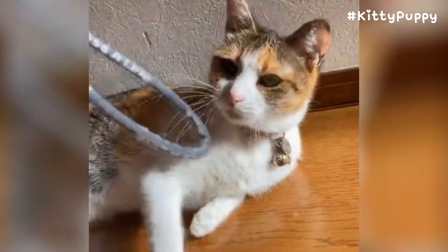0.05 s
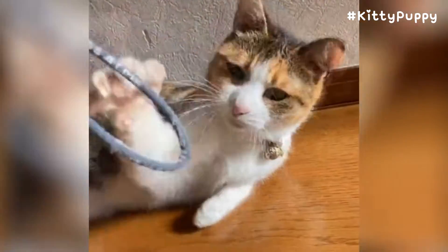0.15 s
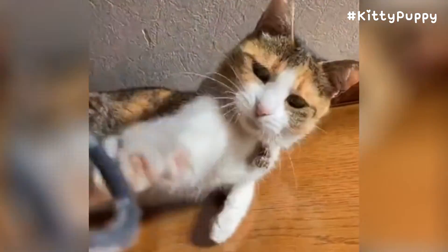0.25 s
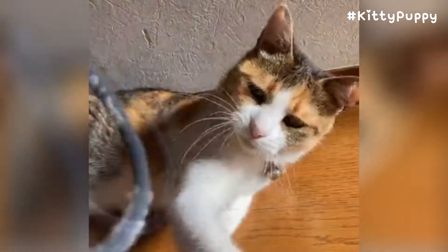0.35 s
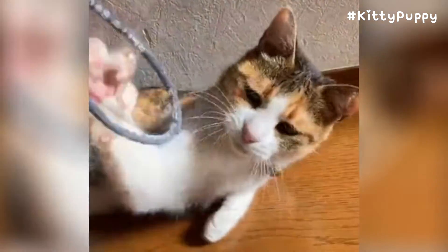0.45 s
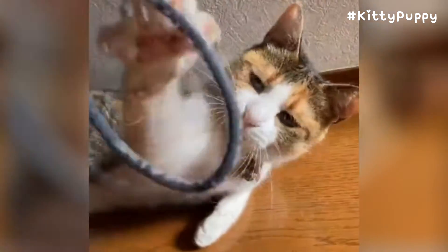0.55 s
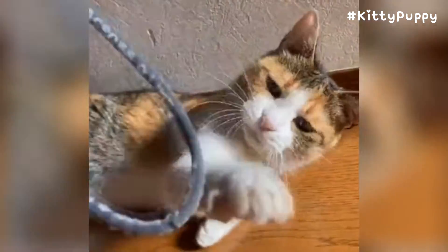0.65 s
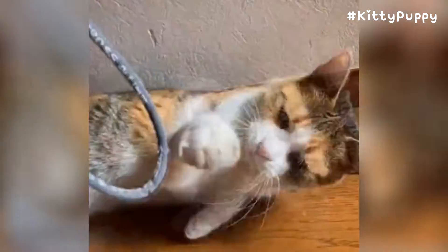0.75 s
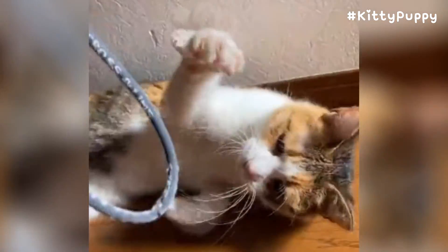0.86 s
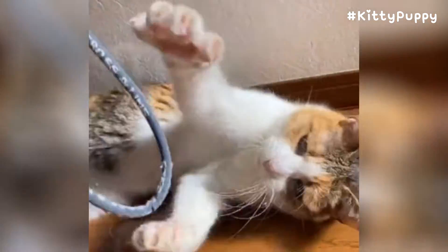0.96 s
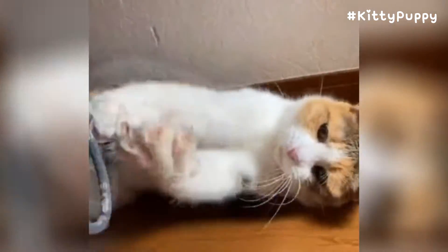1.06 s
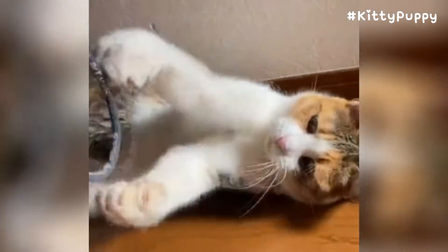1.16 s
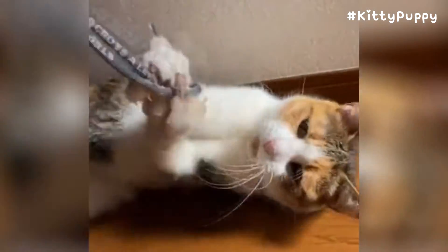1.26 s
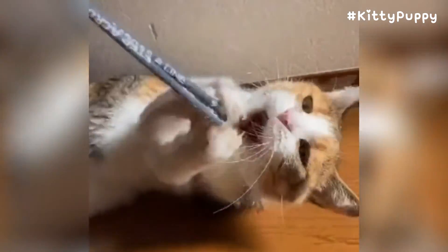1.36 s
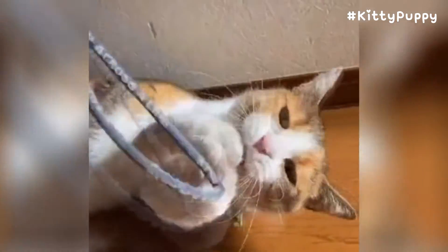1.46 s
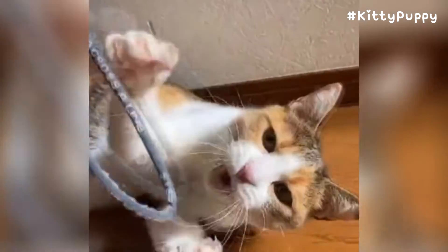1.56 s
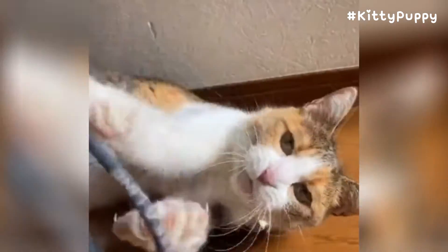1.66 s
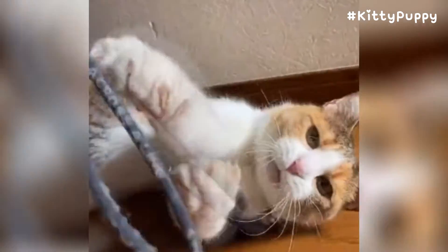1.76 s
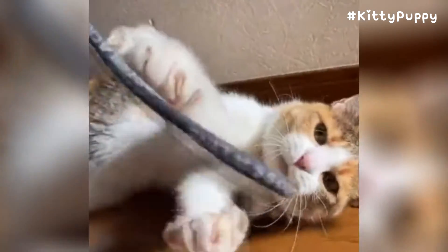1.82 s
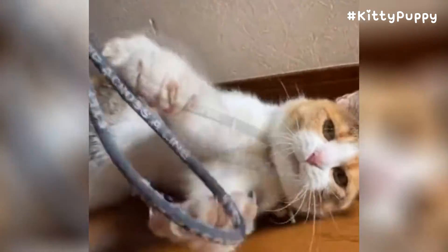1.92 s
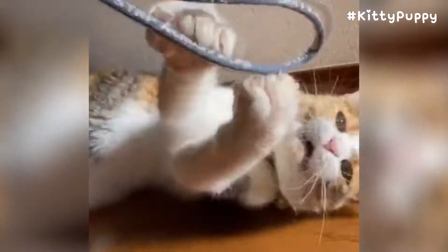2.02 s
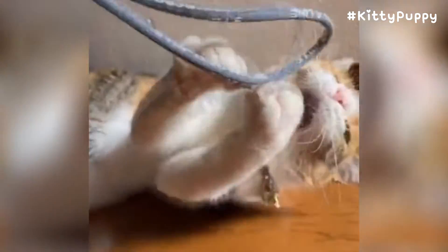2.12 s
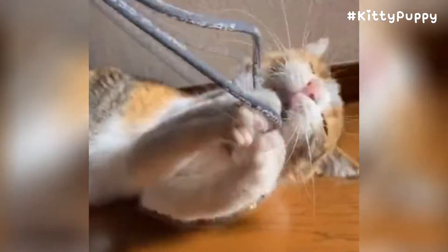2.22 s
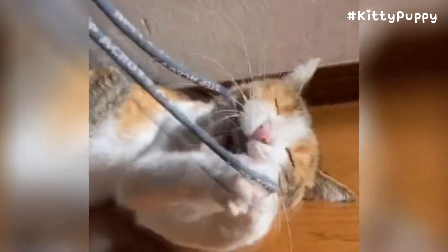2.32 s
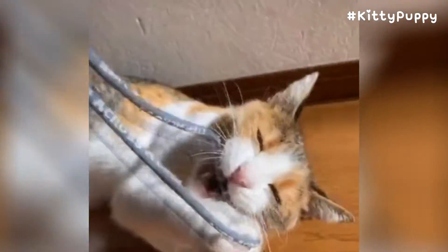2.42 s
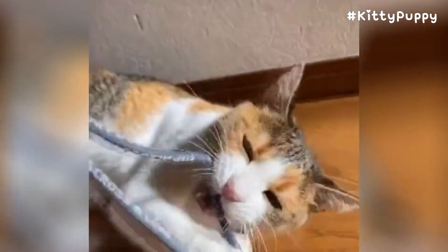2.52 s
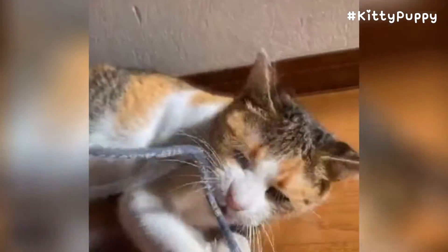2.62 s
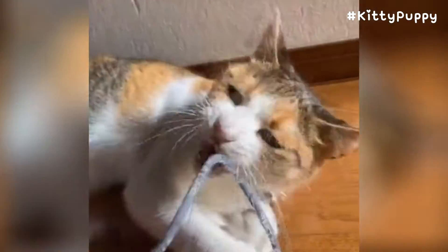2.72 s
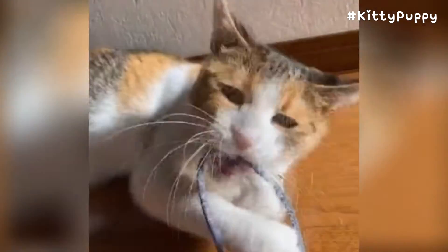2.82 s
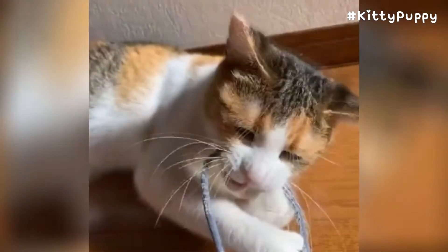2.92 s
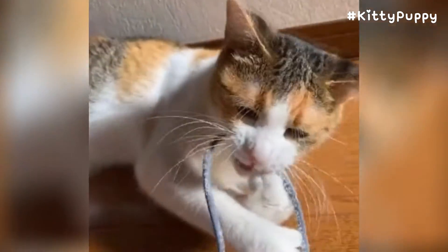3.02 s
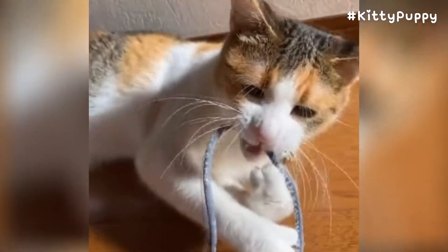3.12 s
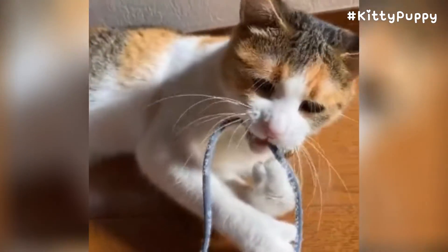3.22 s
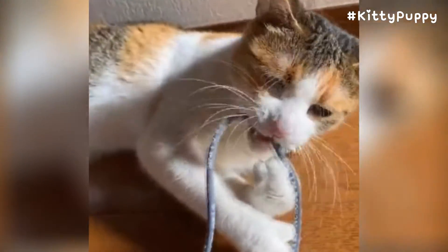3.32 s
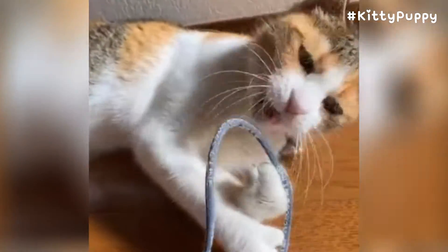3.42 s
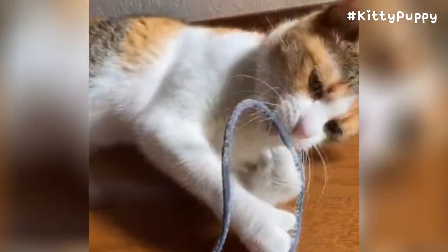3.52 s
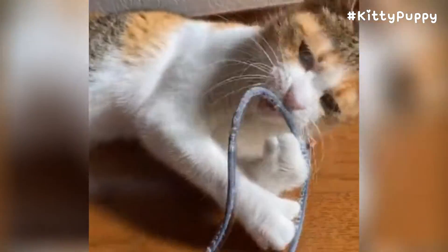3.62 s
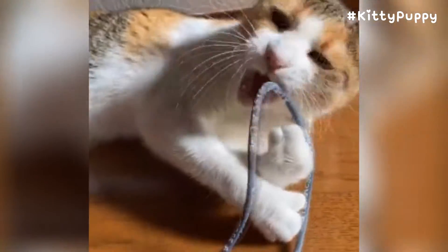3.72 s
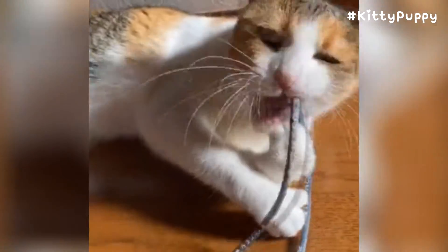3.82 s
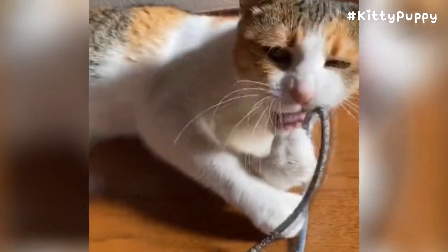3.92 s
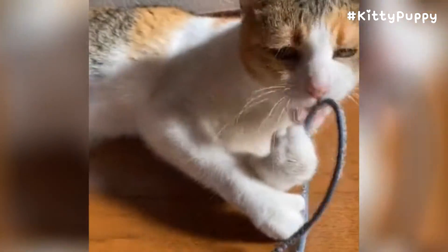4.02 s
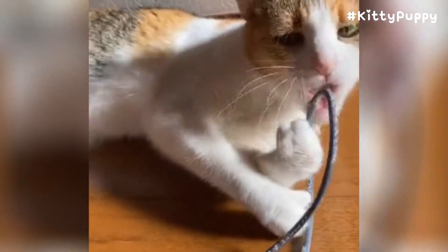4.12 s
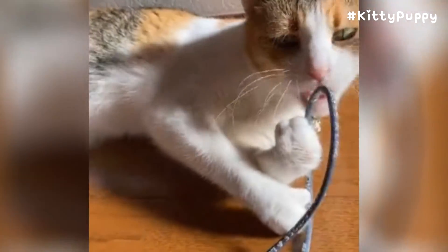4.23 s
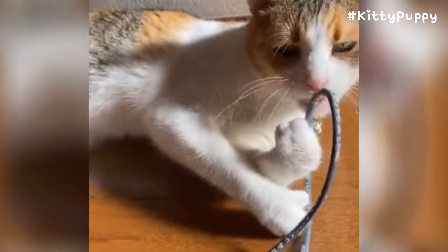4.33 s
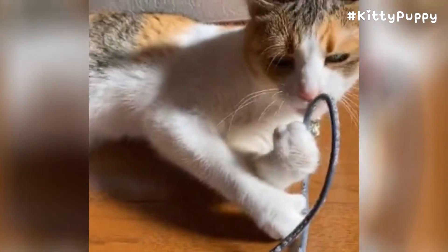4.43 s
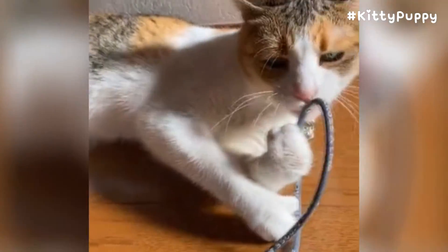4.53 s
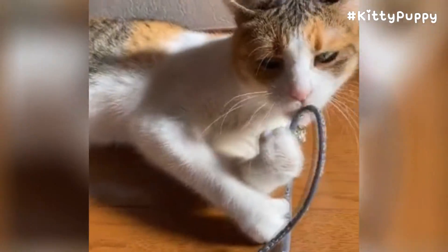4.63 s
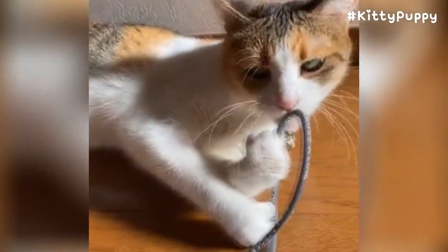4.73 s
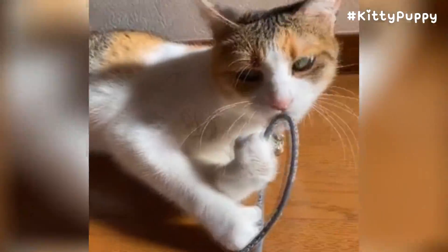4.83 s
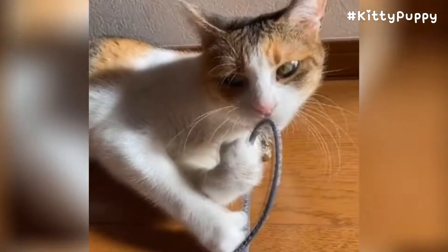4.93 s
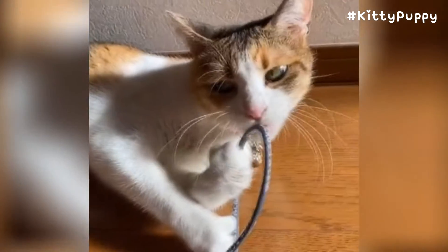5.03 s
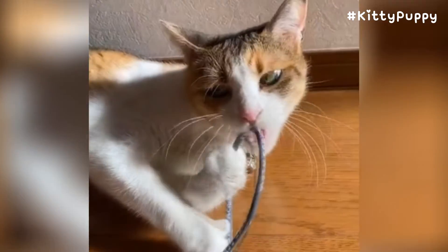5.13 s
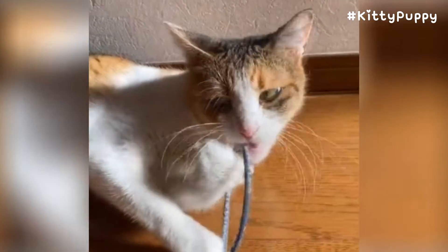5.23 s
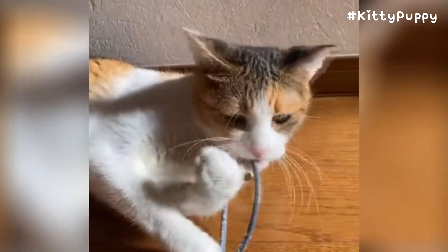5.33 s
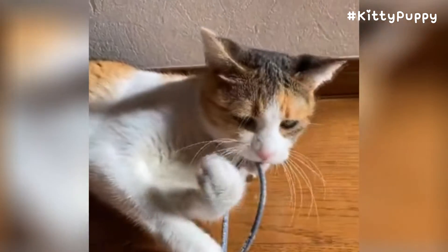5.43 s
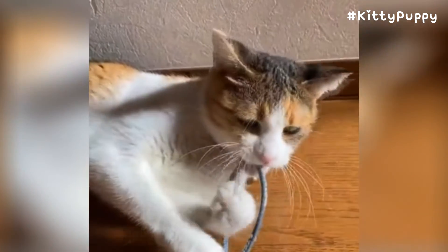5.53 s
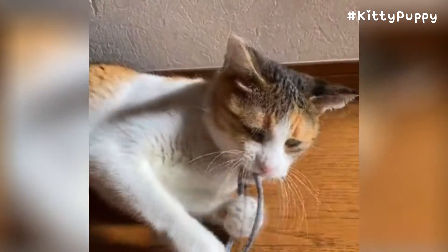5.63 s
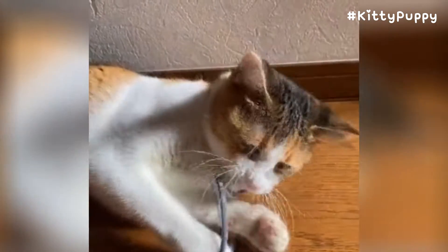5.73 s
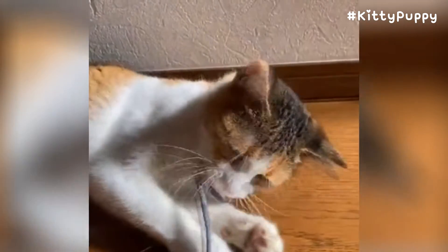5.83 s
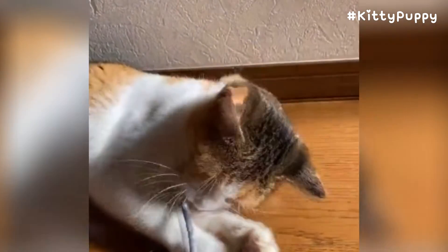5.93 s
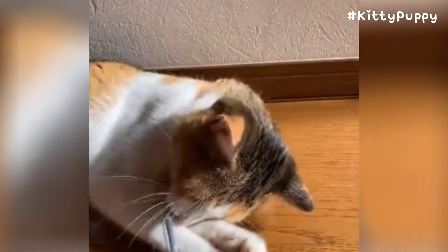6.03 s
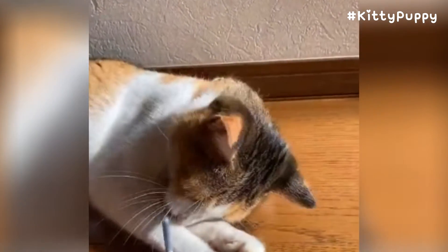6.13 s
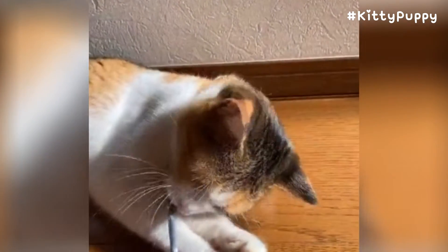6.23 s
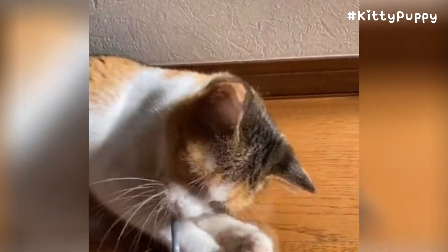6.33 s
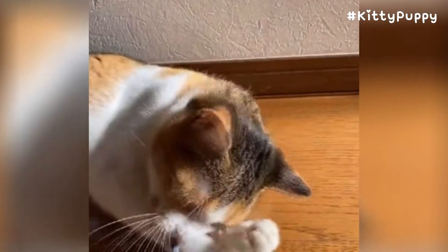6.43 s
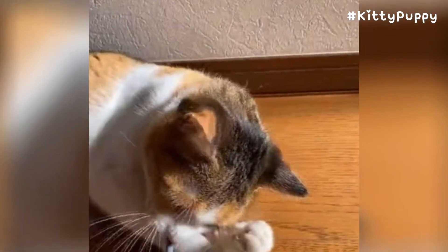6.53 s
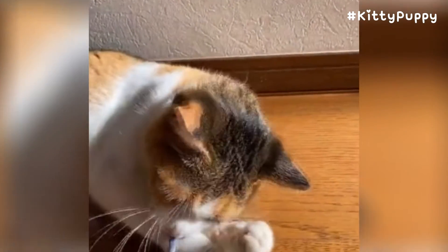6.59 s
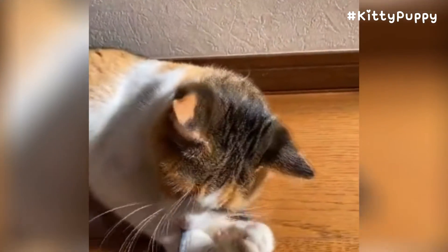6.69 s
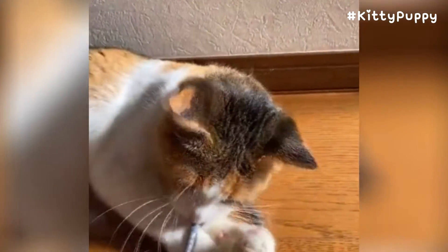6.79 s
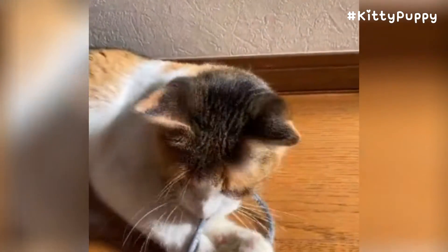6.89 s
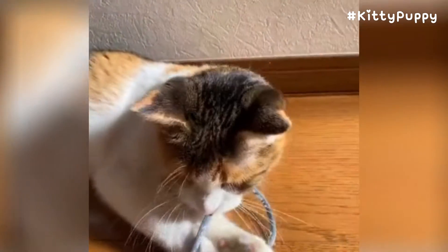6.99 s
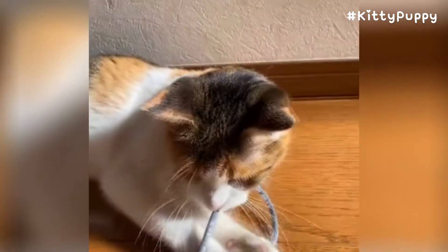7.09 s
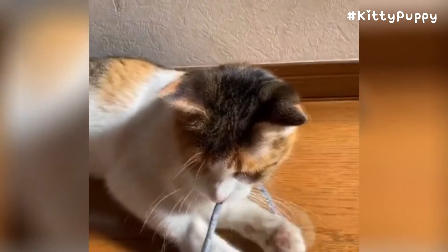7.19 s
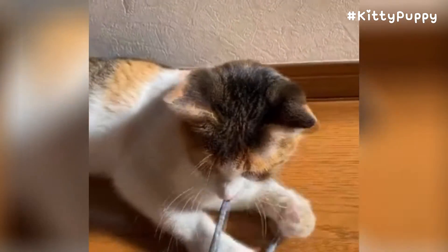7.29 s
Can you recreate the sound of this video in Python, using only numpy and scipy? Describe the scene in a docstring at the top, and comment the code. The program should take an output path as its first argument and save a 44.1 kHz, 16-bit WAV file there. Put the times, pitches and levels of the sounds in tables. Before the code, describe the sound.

Steady hiss and a low hum lie under a high, short-ringing pellet bell on a cat's collar. The bell begins softly, bursts into a dense loud jingle, then breaks into sparse chinks. Paws and claws knock wooden boards, a cord rasps and snaps lightly, and the body rubs dully. Later activity is sparse and quiet, ending with a soft rub and thud. The miking is close, with quick floor echoes and a short live room tail.

```python
"""A low hum and steady hiss come first, then a soft thud and the chink and rattle of a collar bell.
A cat wrestles with a cord on a wooden floor, close to the microphone, in a small live room.
Bell: damped shell modes and a noise spray, struck or fed by tiny taps. Paws: slips driving board modes.
Cord and body: filtered noise and clicks under stroke envelopes. Background: filtered noise and a sine.
"""
import sys
import numpy as np
from scipy import signal
from scipy.fft import rfft, irfft, next_fast_len
from scipy.io import wavfile
from scipy.ndimage import uniform_filter1d

SR = 44100
rng = np.random.default_rng(int(sys.argv[2]) if len(sys.argv) > 2 else 0)


def dump_mix(stems):
    """Bounce the given channels to the path in sys.argv[1] as a 16-bit WAV at rate SR."""
    frames = np.atleast_2d(stems).T  # one column per channel
    limited = np.clip(frames, -1, 1)  # hard clip at full scale
    pcm = np.round(limited * 32767).astype(np.int16)
    wavfile.write(sys.argv[1], SR, pcm)


N = 324399

# Event levels are ahead of each layer's trim_db and of the room.
# still room: (frequency [Hz], relative density [dB])
AIR_SPECTRUM = [(13, -36), (22, -6), (48, -2.5), (74, -3.5), (108, -1.5), (153, -9), (287, -10),
                (464, -16.5), (506, -20), (629, -17.5), (1260, -23.5), (1710, -22.5), (2130, -26.5),
                (2530, -25), (4000, -27.5), (5200, -56), (8800, -120)]
# microphone hiss: (frequency [Hz], relative density [dB])
HISS_SPECTRUM = [(3000, -34), (4200, -8.5), (4700, -0.5), (5200, 2), (5600, 0.5), (7000, -2.5), (8700, -5),
                 (9400, -15), (10300, -22.5), (13300, -23), (15800, -40)]
AIR_RMS_DB, HISS_RMS_DB = -46.5, -49.5
HUM_HZ, HUM_RMS_DB = 102.5, -52.5

# room decay: (frequency [Hz], t60 [s])
ROOM_T60 = [(150, 0.71), (800, 0.62), (2000, 0.71), (4100, 0.54), (8000, 0.84), (15000, 0.45)]
# floor and wall echoes, before jitter and trim: (delay [s], level [dB])
ECHOES = [(.0031, -7), (.0094, -42), (0.011, -5.5), (0.0183, -6.5), (.0205, -13.5)]

# body and soft pads on the floor: (time [s], level [dB], frequency [Hz])
THUDS = [(0.287, -24, 94), (.33, -25, 103), (0.838, -25, 101), (.873, -24, 110), (2.854, -33.5, 115),
         (3.333, -36.5, 78.5), (3.743, -33, 77), (3.788, -28.5, 76.4), (6.434, -33, 86), (6.495, -34, 91),
         (6.518, -31, 56), (6.819, -29.5, 117), (7.272, -31, 92)]
# body rubbing along the boards: (start [s], length [s], level [dB])
RUBS = [(3.686, 0.11, -44.5), (3.9, 0.036, -44), (4.077, 0.16, -49), (7.036, 0.073, -37.5),
        (7.127, 0.037, -47), (7.19, 0.1, -40)]
# rub spectrum: (frequency [Hz], gain [dB])
RUB_SPECTRUM = [(90, -28), (160, -6), (300, -0.5), (430, 5.5), (520, -3.5), (630, -0.5), (760, -13),
                (950, -24), (1600, -16), (3500, -43)]
# cord, fur and paws sliding: (start [s], length [s], level [dB], gain above 5 kHz [dB])
SLIDES = [(0.882, 0.039, -28.5, -9), (1.015, 0.043, -39, -2), (1.304, 0.19, -60, 18.5),
          (1.513, 0.089, -47, -18), (2.16, 0.081, -55, 13.5), (3.298, .11, -35, 1.5),
          (3.441, 0.11, -41, -2.5), (3.555, 0.083, -32.5, -5.5), (3.647, 0.036, -43, 6),
          (3.736, 0.23, -47.5, -0.5), (3.963, 0.066, -43, -7)]
# slide spectrum: (frequency [Hz], gain [dB])
SLIDE_SPECTRUM = [(100, -0.5), (250, -8), (500, -10.5), (680, 1.5), (900, -4.5), (1150, -5), (1800, -7),
                  (2800, -7), (3900, -11), (6500, -13), (11000, -21), (15000, -26), (16000, -31)]
STROKE_RISE_S, STROKE_FADE_S = 0.025, 0.033
# teeth and claws on the cord: (time [s], level [dB])
TICKS = [(1.3616, -24.5), (1.4668, -28), (2.043, -29), (2.204, -33.5), (2.2773, -32.5), (2.3259, -28.5),
         (3.473, -25), (3.5426, -28), (4.7325, -41), (4.855, -35), (4.8843, -34), (4.968, -35.5),
         (5.0293, -38), (5.1552, -34), (5.1822, -32.5), (5.2068, -25), (5.885, -29.5)]
# tick spectrum: (frequency [Hz], gain [dB])
TICK_SPECTRUM = [(150, -5), (500, -9), (1200, 1), (1900, 9.5), (3500, -1.5), (8000, -0.5), (12000, -12.5),
                 (16000, -20)]

# paws and claws on the boards: (time [s], level [dB], claw share before its cap [dB])
KNOCKS = [(.893, -13.5, -1.5), (.9, -7.5, 0), (0.907, -14, 9), (.932, -17, 4), (1.048, -19, -0.5),
          (1.162, -29, -26), (1.263, -24.5, -0.5), (1.811, -14.5, -1.5), (1.835, -17, -2.5),
          (1.898, -11, -1.5), (2.641, -14.5, -21), (2.666, -16.5, -11.5), (2.806, -25.5, -11.5),
          (2.855, -18, -7.5), (3.619, -16.5, -7), (3.936, -27, -15), (4.247, -29.5, -4), (5.213, -31.5, -7),
          (5.653, -29, -11), (5.758, -26.5, -2.5), (5.764, -18.5, -6.5), (6.11, -21, -8.5),
          (6.497, -15.5, -18)]
# floorboard modes, before scatter: (frequency [Hz], level [dB], t60 [s])
BOARD_MODES = [(241, -9.5, 0.038), (320, -21, 0.013), (442, -9, 0.027), (661, -4, 0.023),
               (762, -3.5, 0.012), (960, -8, 0.01), (1255, -4.5, 0.0058)]
# ring of claws on wood, before scatter: (frequency [Hz], level [dB], t60 [s])
CLAW_MODES = [(1396, -0.5, 0.029), (1600, -6.5, 0.017), (1710, 2, 0.023), (1970, -4, 0.015),
              (2400, -10, 0.0043), (2400, -5, 0.011), (2920, -21, 0.0014), (3530, 7, 0.0024),
              (5500, -4, 0.0014)]
# bare claw scratch: (frequency [Hz], gain [dB])
CLATTER_SPECTRUM = [(200, -22), (600, -10), (1100, 2), (2300, 2), (3300, -9), (5000, -23), (12000, -32)]
# a heavier blow skids for longer
SCUFF_S, SCUFF_DOUBLES_DB, REFERENCE_KNOCK_DB = 0.011, 37, -23.5

# clear pellet strikes: (time [s], level [dB], pitch [Hz], upper modes re main [dB])
STRIKES = [(.423, -26, 4170, -15), (.512, -36, 4390, -24), (0.599, -26.5, 4040, -15),
           (.653, -27.5, 3910, -27), (0.6651, -21, 3990, -21), (0.6812, -19.5, 4140, -14),
           (.711, -18, 3990, -15), (0.7465, -18.5, 4120, -22), (0.7575, -20, 4380, -14),
           (0.801, -23.5, 4360, -16), (.824, -21.5, 4360, -18), (0.8452, -17, 4250, -19),
           (0.9082, -8, 4040, -19.5), (0.936, -6, 4114, -28), (1.02, -7.5, 4020, -13),
           (1.03, -2.5, 4095, -14.5), (1.0382, -19, 4040, -19), (1.0493, -0.5, 4047, -26),
           (1.0751, -4.5, 4200, -21), (1.08, -7.5, 4106, -22), (1.1285, -18, 4100, -18),
           (1.139, -17, 4110, -11), (1.1923, -11, 4126, -23), (1.236, -10, 4157, -21.5),
           (1.318, -12.5, 4120, -23), (1.5227, -24, 4110, -31), (1.655, -20.5, 4105, -10.5),
           (1.677, -16, 4130, -22), (1.853, -10, 4126, -11.5), (1.865, -17, 4054, -34),
           (1.897, -11.5, 4066, -30), (2.033, -23.5, 4230, -14), (2.2065, -21, 4160, -17),
           (2.3263, -11.5, 4065, -27), (2.3446, -14.5, 4304, -26), (2.6413, -24, 4110, -7),
           (2.667, -14.5, 4340, -17), (2.756, -18, 4340, -19), (2.7659, -11, 4210, -14),
           (2.7743, -17, 4210, -17), (2.8374, -20, 4370, -10.5), (3.0768, -28.5, 4170, -18),
           (3.2614, -28.5, 4076, -18), (3.668, -28, 3920, -11), (3.713, -4.5, 4150, -19.5),
           (3.728, -17.5, 4200, -11.5), (3.809, -28, 4090, -34), (5.807, -29, 4270, -32),
           (5.904, -16, 4170, -18), (5.9835, -27.5, 4160, -20), (6.022, -25.5, 4110, -21),
           (6.5044, -34, 4140, -18), (6.5242, -29.5, 4130, -18)]
# two lowest bell modes, split by its slit: (frequency at mean pitch [Hz], level [dB], ring factor [1])
SHELL_MODES = [(4080, 0, 1.0), (4290, -14, 1.3)]
# clear upper bell modes, before scatter: (frequency [Hz], level [dB], t60 [s])
OVERTONE_MODES = [(7880, 16, 0.048), (8630, -17, 0.13)]
# crowd of fast-dying high bell modes: (frequency [Hz], gain [dB])
SPRAY_SPECTRUM = [(1000, -3), (3000, -14), (5100, 6), (6500, -4), (8600, 0), (9600, -1), (10500, 1.5),
                  (10900, -17), (11800, -3), (13150, -29), (13500, 3), (15200, -5), (15900, 4)]
# modes with a node where the fur touches, before scatter: (frequency [Hz], level re strike [dB], t60 [s])
FREE_MODES = [(4170, -33.5, 0.78), (9100, -56, 1.1)]
# collar shakes that roll the pellet: (start [s], length [s], level [dB])
SHAKES = [(0.385, 0.2, -44), (0.653, 0.47, -35), (0.874, 0.06, -30.5), (1.02, 0.11, -27), (1.2, .14, -43),
          (1.841, 0.069, -31.5), (2.02, .28, -41.5), (2.323, .11, -34), (2.635, 0.033, -27.5),
          (2.756, 0.11, -30.5), (3.61, .1, -40), (5.75, 0.17, -54), (6.5, 0.036, -43)]
SPIN_UP_S, SETTLE_S = 0.011, 0.048
# fur damps every strike alike; a soft, dull contact swells more slowly than a hard, bright one
RING_T60_S, SWELL_S, SWELL_HALVES_DB, REFERENCE_UPPER_DB = 0.026, 0.00096, 20, -21.5
BAND_LIMIT_HZ = 15900


def amp(db):
    """Decibels to gain."""
    return 10 ** (np.asarray(db) / 20)


def unit(x):
    """Scales to rms 1."""
    return x / np.sqrt(np.mean(x ** 2) + 1e-20)


def crest(x):
    """Scales to peak 1."""
    return x / (abs(x).max() + 1e-20)


def read(points, hz):
    """Interpolates a table along a log-frequency axis."""
    f, value = np.transpose(points)
    return np.interp(np.log(hz + 1), np.log(f + 1), value)


def colour(x, points):
    """Filters by a spectrum in dB, at zero phase."""
    size = next_fast_len(len(x))
    gain = amp(read(points, np.fft.rfftfreq(size, 1 / SR)))
    return irfft(rfft(x, size) * gain, size)[:len(x)]


def add(mix, time_s, sound):
    """Lays a sound into the mix at a time."""
    part = mix[max(round(time_s * SR), 0):][:len(sound)]
    part += sound[:len(part)]


def seconds(size):
    """A time axis of so many samples."""
    return np.arange(size) / SR


def ring(modes, t, scatter_db):
    """Damped modes; strength and sign depend on where the blow lands, here drawn at random."""
    out = np.zeros(len(t))
    for hz, db, t60_s in modes:
        sign = rng.choice([-1, 1])
        level_db = db + scatter_db * rng.standard_normal()
        out += sign * amp(level_db - 60 * t / t60_s) * np.sin(2 * np.pi * hz * t)
    return out


def grains(size, per_s, spread_db):
    """Sparse clicks of uneven strength and random sign."""
    strength = amp(spread_db * np.minimum(rng.exponential(1, size), 4))
    return rng.choice([-1, 1], size) * strength * (rng.random(size) < per_s / SR)


def gesture(start_s, length_s, rise_s, fade_s):
    """Envelope of one movement: linear attack, hold, exponential release."""
    t = seconds(N) - start_s
    return np.clip(t / rise_s, 0, 1) * np.exp(-np.maximum(t - length_s, 0) / fade_s)


def tail(build_s=0.0034):
    """A dense room tail of energy 1 that builds up and dies band by band."""
    hz, t, bands = signal.stft(rng.standard_normal(2 ** 15), SR, nperseg=256)
    decay = amp(-60 * t / read(ROOM_T60, hz)[:, None])
    wash = signal.istft(bands * decay, SR, nperseg=256)[1]
    wash *= 1 - np.exp(-(seconds(len(wash)) / build_s) ** 2)
    return wash / np.linalg.norm(wash)


def room(x, wet_db, echo_db):
    """Near echoes and a dense tail; four sets of paths take turns, as the cat moves about."""
    out = x.copy()
    for place in range(4):
        response = amp(wet_db) * tail()
        for delay_s, db in ECHOES:
            add(response, delay_s + .0005 * rng.uniform(-1, 1), amp([db + echo_db]))
        # each place fades in and out twice a second
        here = np.maximum(np.cos(2 * np.pi * (2 * seconds(N) - place / 4)), 0)
        out += signal.oaconvolve(x * here, response)[:N]
    return out


def waver():
    """A slow random swing of rms 1, from sines of 0.5 to 7 Hz."""
    t = seconds(N)
    return unit(sum(np.sin(2 * np.pi * (hz * t + rng.random())) / np.sqrt(hz)
                    for hz in np.geomspace(.5, 7, num=16)))


def background():
    """Room rumble and microphone hiss as filtered noise; an appliance hum wavering in level and phase."""
    air = amp(AIR_RMS_DB) * unit(colour(rng.standard_normal(N), AIR_SPECTRUM))
    hiss = amp(HISS_RMS_DB) * unit(colour(rng.standard_normal(N), HISS_SPECTRUM))
    swing, drift = waver(), waver()
    hum = unit((1 + .25 * swing) * np.sin(2 * np.pi * HUM_HZ * seconds(N) + .4 * drift))
    return air + hiss + amp(HUM_RMS_DB) * hum


def thuds(trim_db=-2, swell_s=.014):
    """Soft weight pushes the floor into a few slow swings."""
    out, t = np.zeros(N), seconds(size=8000)
    push = crest((t / swell_s) ** 2 * np.exp(-2 * t / swell_s))
    for time_s, db, hz in THUDS:
        add(out, time_s, amp(db + trim_db) * push * np.sin(2 * np.pi * hz * t))
    return out


def rubs(trim_db=-2, fade_s=0.071):
    """Stick and slip of the body on the boards, a dull grumble."""
    grumble = unit(colour(grains(N, per_s=500, spread_db=0.5), RUB_SPECTRUM))
    return grumble * sum(amp(trim_db + db) * gesture(start_s, length_s, STROKE_RISE_S, fade_s)
                         for start_s, length_s, db in RUBS)


def slides(trim_db=-1, catch_db=2.0):
    """Thousands of fibre slips a second, clumped as the cord catches; a tighter pull sharpens their edge."""
    catches = amp(catch_db * unit(uniform_filter1d(rng.standard_normal(N), size=350)))
    slips = unit(grains(N, per_s=2200, spread_db=3.6)) + .5 * rng.standard_normal(N)
    rasp = unit(colour(catches * slips, SLIDE_SPECTRUM))
    high_pass = signal.butter(2, 5000, "high", fs=SR, output="sos")
    edge = signal.sosfiltfilt(high_pass, rasp)
    out = np.zeros(N)
    for start_s, length_s, db, edge_db in SLIDES:
        stroke = amp(trim_db + db) * gesture(start_s, length_s, STROKE_RISE_S, STROKE_FADE_S)
        out += stroke * (rasp - edge + amp(edge_db) * edge)
    return out


def ticks(trim_db=1, decay_s=0.0024):
    """Tiny snaps of fibres catching and letting go: decaying noise."""
    out, t = np.zeros(N), seconds(size=1024)
    for time_s, db in TICKS:
        snap = rng.standard_normal(len(t)) * np.exp(-t / decay_s)
        add(out, time_s, amp(db + trim_db) * crest(colour(snap, TICK_SPECTRUM)))
    return out


def paws(wood_db=-4, claw_db=-2.0, scuff_db=-15, clatter_db=-5):
    """A blow and a dying scrabble of small slips drive the boards and the claws' ring and clatter."""
    out, t = np.zeros(N), seconds(size=5000)
    for time_s, db, claw_share_db in KNOCKS:
        skid_s = SCUFF_S * 2 ** ((db - REFERENCE_KNOCK_DB) / SCUFF_DOUBLES_DB)
        slips = grains(len(t), per_s=2400, spread_db=2.5) * np.exp(-t / skid_s)
        force = amp(scuff_db) * slips + (t == 0)
        wood = crest(signal.fftconvolve(force, ring(BOARD_MODES, t, scatter_db=1.5)))
        claw = crest(signal.fftconvolve(force, ring(CLAW_MODES, t, scatter_db=1.5)))
        clatter = crest(colour(np.pad(slips, 64), CLATTER_SPECTRUM))
        add(claw, 0, amp(clatter_db) * clatter)
        share = min(amp(claw_share_db), .92)
        wood_gain = amp(wood_db) * np.sqrt(1 - share ** 2)
        claw_gain = amp(claw_db) * share
        add(out, time_s, amp(db) * (wood_gain * wood + claw_gain * claw))
    return out


def afterglow():
    """The modes that the fur cannot damp sing on faintly after each strike."""
    kicks, t = np.zeros(N), seconds(size=30000)
    for time_s, db, *_ in STRIKES:
        add(kicks, time_s, amp([db]) * rng.choice([-1, 1]))
    return signal.oaconvolve(kicks, ring(FREE_MODES, t, scatter_db=3))[:N]


def rolling(trim_db=-4.0, ring_t60_s=0.043, spray_db=-20, spray_growth=1.6, brisk_db=-30, detune=.022):
    """Hundreds of pellet taps a second feed the shell, detuned by where it leans; faster is brighter."""
    t = seconds(size=4096)
    all_taps, shell = np.zeros(N), np.zeros(N)
    for lean in np.linspace(-1, 1, num=5):
        taps = grains(N, per_s=65, spread_db=2.5)
        modes = [(hz * (1 + detune * lean), db, ring_t60_s * longer) for hz, db, longer in SHELL_MODES]
        shell += signal.oaconvolve(taps, ring(modes, t, scatter_db=4.5))[:N]
        all_taps += taps
    shell = unit(shell)
    burst = rng.standard_normal(len(t)) * np.exp(-t / 0.006)
    spray = unit(colour(signal.oaconvolve(all_taps, burst)[:N], SPRAY_SPECTRUM))
    speed = sum(amp(db) * gesture(start_s, length_s, SPIN_UP_S, SETTLE_S)
                for start_s, length_s, db in SHAKES)
    spray_gain = amp(spray_db) * (speed / amp(brisk_db)) ** spray_growth
    return amp(trim_db) * speed * (shell + spray_gain * spray)


def strikes(trim_db=0, upper_db=1, overtone_db=-6, spray_db=-1.8, spray_growth=0.34,
            spray_decay_s=0.011, sag=0.12, contact_s=0.00058):
    """Each strike rings the shell briefly; the pitch starts low while the pellet still leans on it."""
    out, t = np.zeros(N), seconds(size=4096)
    loaded_t = t - sag * contact_s * (1 - np.exp(-t / contact_s))
    decay_db = -60 * t / RING_T60_S
    for time_s, db, pitch_hz, bright_db in STRIKES:
        pitched_t = loaded_t * pitch_hz / SHELL_MODES[0][0]
        hardness_db = bright_db - REFERENCE_UPPER_DB
        swell = 1 - np.exp(-(t / SWELL_S * 2 ** (hardness_db / SWELL_HALVES_DB)) ** 2)
        modes = sum(amp(mode_db + decay_db / longer) * np.sin(2 * np.pi * hz * pitched_t)
                    for hz, mode_db, longer in SHELL_MODES)
        shell = crest(swell * modes)
        burst = rng.standard_normal(len(t)) * np.exp(-t / spray_decay_s) * swell
        spray = unit(colour(burst, SPRAY_SPECTRUM))
        overtones = unit(swell * ring(OVERTONE_MODES, t, scatter_db=17))
        # the harder the contact, the more the spray outweighs the clear modes
        upper = amp(spray_db + spray_growth * hardness_db) * spray + amp(overtone_db) * overtones
        upper_gain = amp(bright_db + upper_db) * shell.std()
        add(out, time_s, amp(db + trim_db) * (shell + upper_gain * upper))
    return out


def scene():
    """Bell, paws, cord and rubs in the room; thuds and background without it."""
    floor = room(paws() + ticks() + slides() + rubs(), wet_db=-4.0, echo_db=-7.0)
    bell = room(strikes() + afterglow() + rolling(), wet_db=-6.5, echo_db=-7.0)
    return (background() + thuds() + floor + bell)[None]


def record(dry):
    """The recorder's bass roll-off, soft ceiling on the loudest peaks, and band limit."""
    thinned = signal.sosfilt(signal.butter(4, 30, "high", fs=SR, output="sos"), dry)
    clean = np.clip(thinned, -.7, .7)
    rounded = clean + .22 * np.tanh((thinned - clean) / .22)
    low_pass = signal.firwin(511, BAND_LIMIT_HZ, window=("kaiser", 9), fs=SR)
    return signal.oaconvolve(rounded, low_pass[None], "same")


dry = scene()
out = record(dry)
dump_mix(out)
```